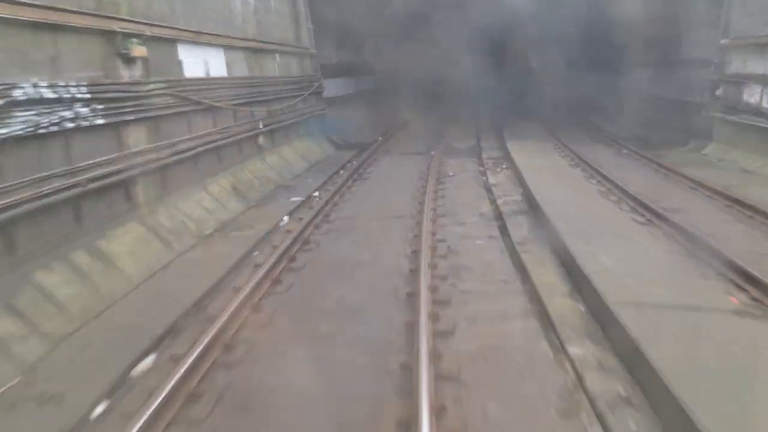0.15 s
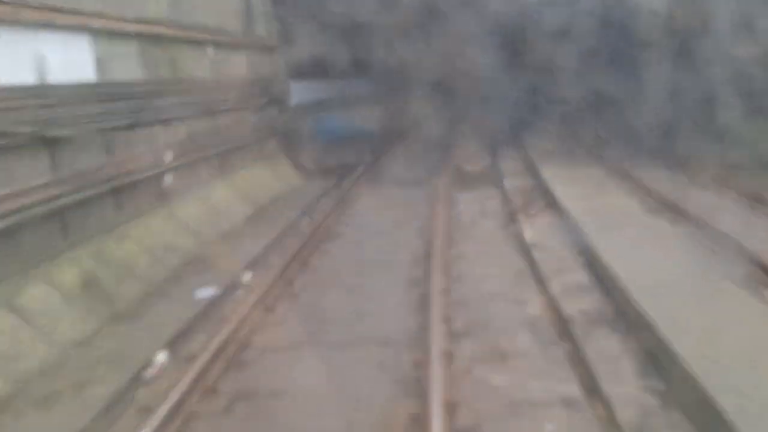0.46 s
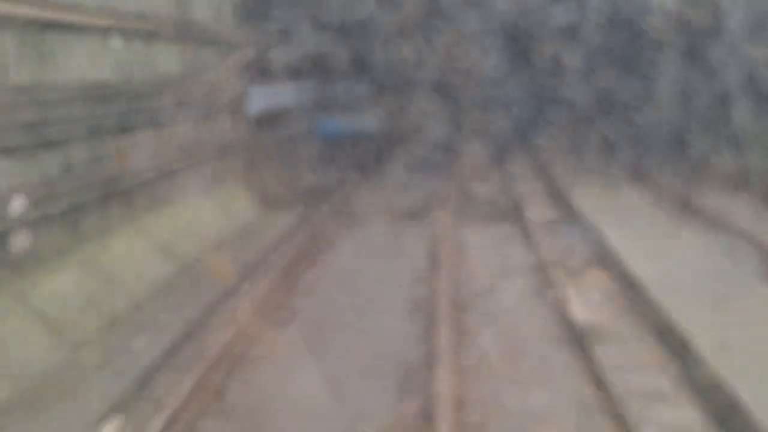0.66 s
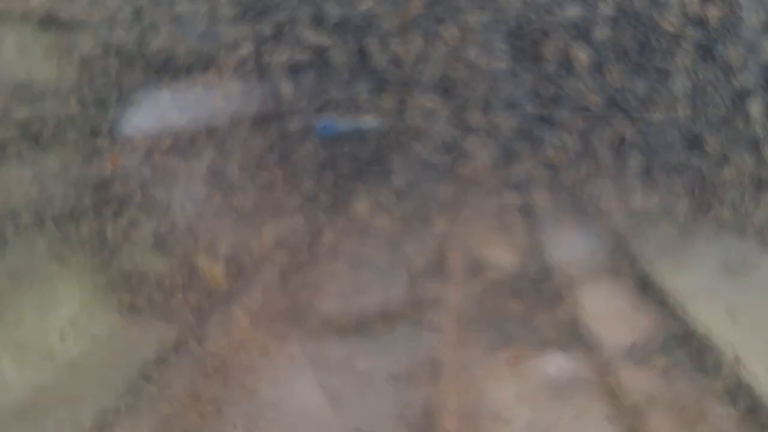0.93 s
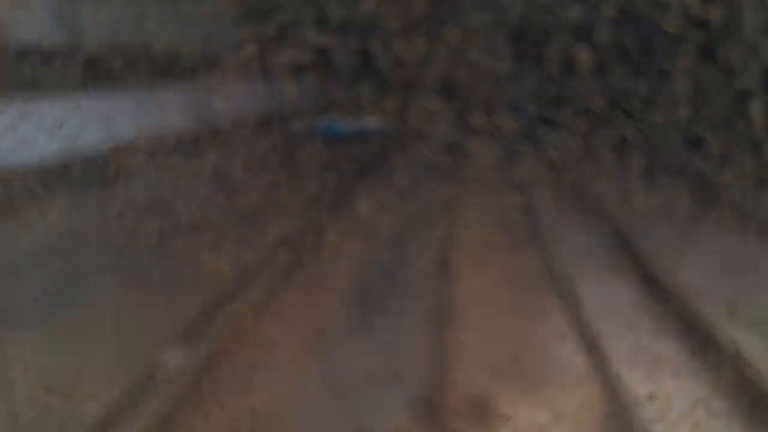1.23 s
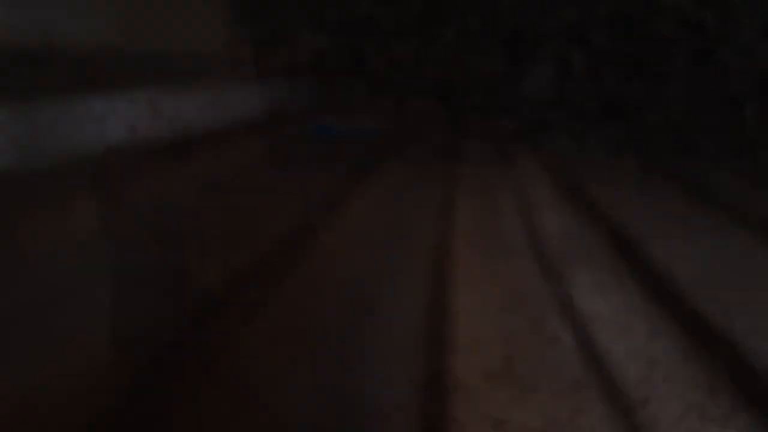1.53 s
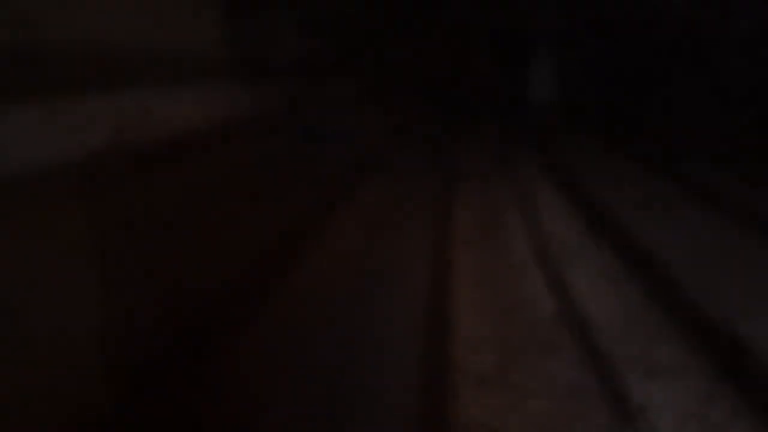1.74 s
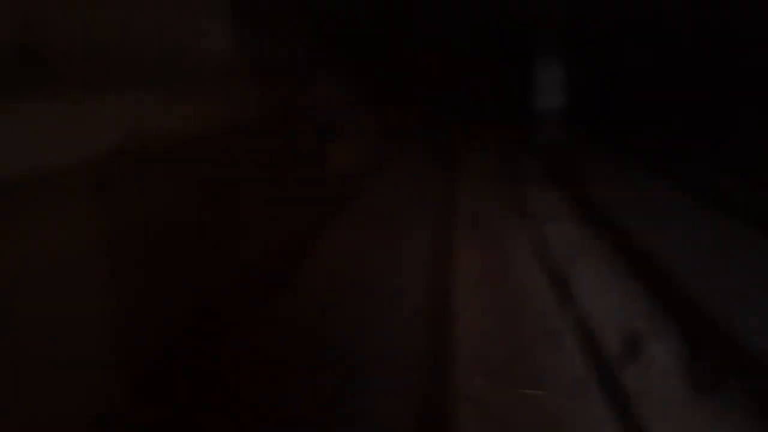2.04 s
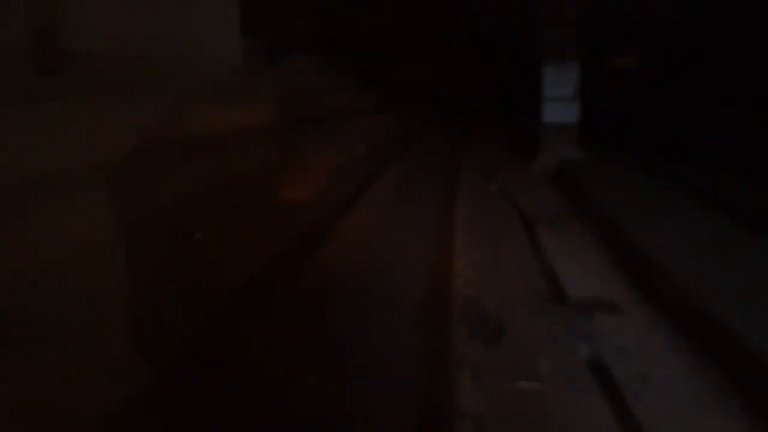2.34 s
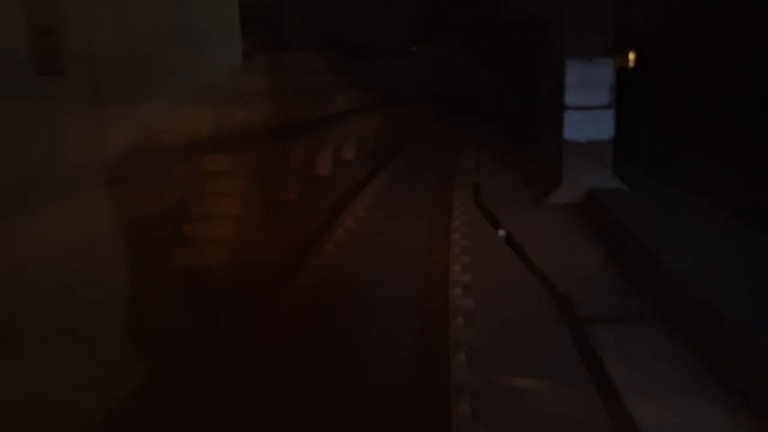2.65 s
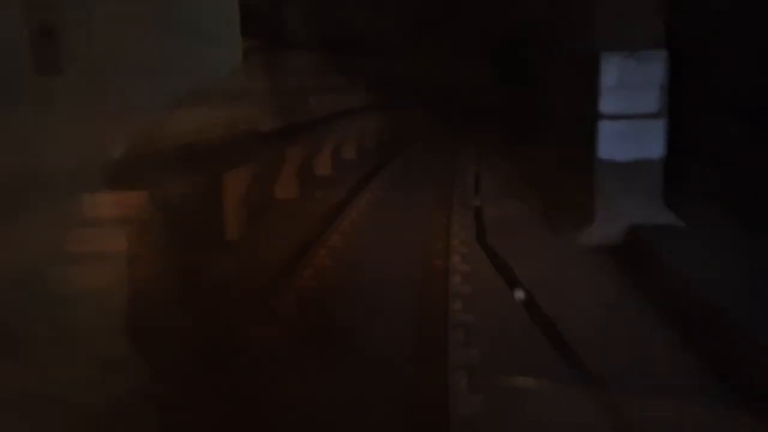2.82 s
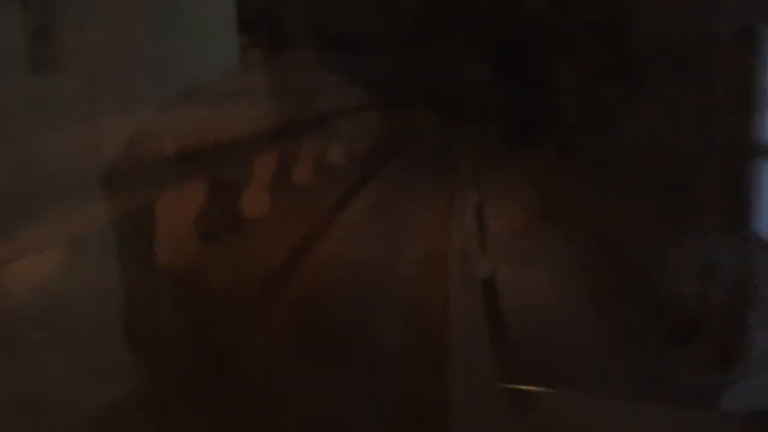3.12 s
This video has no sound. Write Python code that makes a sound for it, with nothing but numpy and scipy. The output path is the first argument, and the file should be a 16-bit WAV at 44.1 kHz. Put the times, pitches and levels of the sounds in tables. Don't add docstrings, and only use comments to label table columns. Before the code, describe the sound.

A moving train rumbles continuously inside its cab, deep booming surging unevenly beneath a rolling roar. Wheel-on-rail hiss scuffs about six times a second, with faint metallic ringing and tiny grit ticks, mostly in the first second. Around 1.7-1.8 seconds the tunnel makes the roar louder and fuller. Faint high squeals come and go from about 1.5 to 3.3 seconds; low thumps strengthen after 2.

```python
import sys
import numpy as np
from scipy import signal
from scipy.io import wavfile
from scipy.ndimage import uniform_filter1d

SR = 44100
rng = np.random.default_rng(int(sys.argv[2]) if len(sys.argv) > 2 else 0)


def invert_db(x):
    u = np.asarray(x, float) / 20
    return 10 ** u


def file_out(sig):
    cols = np.atleast_2d(sig).T
    lim = np.clip(cols, -1, 1)
    pcm = np.round(lim * 32767).astype(np.int16)
    wavfile.write(sys.argv[1], SR, pcm)


N = 144648


def evened(x):
    return x / np.sqrt(np.mean(x ** 2) + 1e-20)


def read(points, hz):
    f, value = np.transpose(points)
    return np.interp(np.log(hz + 1), np.log(f + 1), value)


def curve(points, t):
    return np.interp(t, *np.transpose(points))


def smoothed_twice(x, size):
    return uniform_filter1d(uniform_filter1d(x, size=size), size=size)


def sides(db):
    return invert_db(np.array([db / 2, -db / 2]))


def resonate(x, hz, width):
    turn = np.exp(2j * np.pi * hz * np.arange(x.shape[-1]) / SR)
    r = np.exp(-np.pi * max(width, 1) / SR)
    return (turn * signal.lfilter([(1 - r) ** 2], [1, -2 * r, r * r], x / turn)).real


def bins(size):
    return np.fft.rfftfreq(size, 1 / SR), np.arange(N * 4 // size + 5) * size / (4 * SR)


# frequency in Hz, likeness from -1 to 1 (clipped).
PORT_LIKENESS = [(200, 0.94), (300, 0.83), (600, 0.65), (900, 0.16), (1250, -1.136), (1600, -0.074),
                 (1800, 0.49), (2600, -0.07)]
# frequency in Hz, lead of the right port in radians.
PORT_LEAD = [(30, 0.48), (70, 0.27), (100, 0.17), (160, 0.087), (200, 0.13), (600, 0.029)]
# frequency in Hz, left minus right in dB.
LEAN_LOW = [(25, 5.5), (50, 2.4), (90, 2.6), (180, .6), (350, 1.2), (450, -1.1), (630, 2.6), (800, -1.5)]
# frequency in Hz, left minus right in dB.
LEAN_HIGH = [(1500, -3), (2500, -1.7), (3700, 0), (4400, -5), (6500, -4.5), (7900, .7), (10600, -13),
             (13000, -4)]


def air(field_db, size, lean, patchy_db, flicker_db):
    hz, t = bins(size)
    a, b, c, d, patches = rng.standard_normal((len(t), len(hz), 5)).T
    patches = uniform_filter1d(patches, size=10, axis=0)
    patches = evened(uniform_filter1d(patches, size=10, axis=1))
    flicker = evened(uniform_filter1d(rng.standard_normal(len(t)), size=3))
    same = np.clip(read(PORT_LIKENESS, hz), -1, 1)[:, None]
    left = a + 1j * b
    shared = same * left * np.exp(1j * read(PORT_LEAD, hz))[:, None]
    right = shared + np.sqrt(1 - same ** 2) * (c + 1j * d)
    z = np.array([left, right]) * sides(read(lean, hz))[:, :, None]
    z *= invert_db(field_db + patchy_db * patches + flicker_db * flicker)
    return signal.istft(z, nperseg=size, noverlap=size * 3 // 4)[1][:, :N]


# start in seconds, peak level in dB, pitch in Hz.
TICKS = [(0.0633, -38, 10700), (0.0927, -39, 9590), (0.2254, -57, 11600), (0.414, -46, 9810),
         (0.425, -42, 10000), (0.735, -44, 10200), (0.79, -47, 10000), (0.7067, -39, 9740),
         (0.8931, -45, 11700), (0.9488, -45, 10180), (1.7103, -45, 9800), (1.735, -42, 10200),
         (2.3693, -44, 10620), (3.045, -41, 9640)]
TICK_S, TICK_DB, TICK_LEAN_DB = 0.00095, -6, -12


def ticks():
    out, t = np.zeros((2, N + 600)), np.arange(600) / SR
    envelope = t / TICK_S * np.exp(1 - t / TICK_S)
    wobble = 0.71 * np.sin(2 * np.pi * 1400 * t)
    for s, db, hz in TICKS:
        snap = envelope * np.sin(2 * np.pi * hz * t + wobble)
        a = int(s * SR)
        out[:, a:a + 600] += invert_db(db + TICK_DB) * sides(TICK_LEAN_DB)[:, None] * snap
    return out[:, :N]


# middle in seconds, level in dB, pitch in Hz.
THUMPS = [(.3, -31, 200), (.9, -30.5, 151), (1.03, -29, 195), (1.17, -24, 145), (1.3, -22.5, 139.9),
          (1.62, -25, 148.7), (2.07, -24, 150), (2.17, -25, 150.4), (2.25, -23.5, 133.5),
          (2.5, -25.5, 298.7), (2.53, -30.5, 448.5), (2.54, -18, 135.7), (3.0, -16, 52.45), (2.2, -18, 50),
          (2.57, -25.5, 199.7), (2.75, -19, 124.1), (3.1, -23, 128.8), (3.19, -19.5, 125.1)]
THUMP_S = 0.024


def thumps():
    out, t = np.zeros((2, N)), np.arange(N) / SR
    for (s, db, hz), phase in zip(THUMPS, rng.random(len(THUMPS))):
        turn = 2 * np.pi * (hz * t + phase) + np.array([[0], [read(PORT_LEAD, hz)]])
        out += invert_db(db) * np.sqrt(2) * np.exp(-((t - s) / THUMP_S) ** 2) * np.sin(turn)
    return out


# start, loudest and end in seconds, pitch in Hz, level in dB.
SQUEALS = [(1.675, 1.72, 2.05, 6490, -56), (1.8, 2.16, 2.44, 6515, -48), (2.3, 2.4, 2.55, 6540, -56),
           (2.2, 2.38, 2.55, 7740, -56.5), (2.4, 2.58, 2.7, 7780, -55.5), (2.55, 2.73, 2.9, 7810, -51.5),
           (2.95, 2.985, 3.16, 6530, -51), (3.0, 3.08, 3.14, 6530, -54), (3.08, 3.2, 3.4, 6540, -56),
           (2.95, 3.0, 3.1, 3910, -48), (2.46, 2.55, 2.66, 3800, -59), (2.82, 2.88, 2.95, 3850, -57),
           (1.515, 1.57, 1.6, 9080, -61.5), (1.63, 1.66, 1.69, 9080, -67),
           (1.75, 1.772, 1.79, 11050, -61.5), (1.78, 1.805, 1.83, 10950, -62.5)]
SQUEAL_DB, SWELL = 0.5, 0.8
SQUEAL_WIDTH_HZ, SKIRT_WIDTH_HZ, SKIRT_DB = 110, 400, 6
PURE, WAVER_HZ, PORT_DRIFT = 0.64, 26, 1.1


def squeals():
    t, out = np.arange(N) / SR, np.zeros((2, N))
    for s, top, end, hz, db in SQUEALS:
        a, b = int(s * SR), min(int(end * SR), N)
        rub = rng.standard_normal((4, SR))[:, :b - a]
        waver = evened(smoothed_twice(rub[2:], 900))
        turn = 2 * np.pi * np.cumsum(hz + WAVER_HZ * waver[0]) / SR
        tone = np.sqrt(2) * np.sin(turn + PORT_DRIFT * waver[1] * np.array([[0], [1]]))
        core = evened(resonate(rub[:2], hz, SQUEAL_WIDTH_HZ))
        fuzz = core + invert_db(SKIRT_DB) * evened(resonate(rub[:2], hz, SKIRT_WIDTH_HZ))
        shape = np.interp(t[a:b], [s, top, end], [0, 1, 0]) ** SWELL
        gain = invert_db(db + SQUEAL_DB) * sides(read(LEAN_HIGH, hz))[:, None]
        out[:, a:b] += gain * shape * (PURE * tone + (1 - PURE) * fuzz)
    return out


# start in seconds, strength in dB over the hiss, length in seconds.
SCUFFS = [(0.034, 6.5, 0.058), (0.214, 10, 0.059), (0.399, 8.5, 0.025), (0.54, 3.5, 0.028),
          (0.7, 3.5, 0.066), (0.87, 0.5, 0.029), (1.022, 3, 0.074), (1.172, 3, 0.053), (1.347, 7, 0.036),
          (1.499, 0.5, 0.061), (1.707, 2, 0.056), (1.885, 0.5, 0.044), (2.041, 1, 0.16), (2.164, 6, 0.055),
          (2.242, 3.5, 0.19), (2.444, 4, 0.23), (2.72, 4, 0.067), (2.827, 7, 0.079), (3.031, 3.5, 0.045),
          (3.179, 7, 0.061)]
SCUFF_RISE_S, SCUFF_FALL_S = 0.011, 0.052
LULLS = [.37, .665, .845, .995, 1.15, 1.66, 1.84, 2.0, 2.71, 3.165]
LULL_DB, LULL_S = -4.5, 0.028


def scuffing(t):
    s, db, length = np.transpose(SCUFFS)[:, :, None]
    rise = np.clip((t - s) / SCUFF_RISE_S, 0, 1)
    fall = np.exp(-np.maximum(t - s - length, 0) / SCUFF_FALL_S)
    lull = np.exp(-((t - np.array(LULLS)[:, None]) / LULL_S) ** 2)
    return (db * rise * fall).max(0) + LULL_DB * lull.max(0)


# frequency in Hz, share from 0 to 1.
SCUFF_REACH = [(300, 0.13), (700, 0.27), (2000, 0.25), (6000, 0.41), (9500, 0.75), (14000, 0.75)]


def scuff_lift(hz, t):
    return read(SCUFF_REACH, hz)[:, None] * scuffing(t)


# time in seconds, hiss level in dB.
CONTACT = [(0, -45.5), (.9, -45), (1.7, -46), (2.2, -45), (2.57, -43.5), (2.72, -44), (3.28, -45)]


def contact(t):
    level = curve(CONTACT, t)
    return level.mean(), level - level.mean()


# pitch in Hz, width in Hz, level in dB.
WHEEL = [(1410, 25, -63), (1552, 20, -64), (1830, 25, -66), (2550, 60, -69), (3133, 40, -70),
         (3575, 15, -69), (3795, 40, -65), (4375, 20, -69), (5120, 220, -64)]


def wheels():
    t = np.arange(N) / SR
    out = np.zeros((2, N))
    for hz, width, db in WHEEL:
        ring = evened(resonate(rng.standard_normal((2, N)), hz, width))
        out += invert_db(db) * sides(read(LEAN_HIGH, hz))[:, None] * ring
    return out * invert_db(contact(t)[1] + 0.97 * scuffing(t))


# frequency in Hz, density in dB per Hz.
HISS = [(900, 3.5), (1300, 1), (2000, -6), (5200, -9.5), (7500, -13), (8600, -21.5), (10800, -18),
        (15500, -23)]
HISS_DB, CONTACT_TREBLE = 4.0, 0.3


def hiss():
    hz, t = bins(256)
    mean_db, change_db = contact(t)
    follows = np.where(hz > 8200, CONTACT_TREBLE, 1)[:, None]
    field = (read(HISS, hz) - 60 * (hz < 700))[:, None] + follows * change_db
    field = field + scuff_lift(hz, t)
    noise = air(field, size=256, lean=LEAN_HIGH, patchy_db=0.62, flicker_db=0.1)
    return invert_db(mean_db + HISS_DB) * evened(noise)


# time in seconds, roar level in dB.
WALLS = [(0, -28.5), (.3, -27.5), (.4, -30), (.6, -28.5), (1.15, -27.5), (1.5, -29.5), (1.69, -28),
         (1.82, -22.5), (2.05, -24), (2.3, -23.5), (2.47, -23), (2.55, -20.5), (2.65, -21), (2.85, -22),
         (3.12, -21.5), (3.2, -21.5), (3.28, -21)]
# frequency in Hz, density in dB per Hz.
ROAR_OPEN = [(85, -35), (110, 0.5), (140, 1.5), (250, -15.5), (300, -9.5), (800, -13), (1200, -23),
             (1700, -37)]
# frequency in Hz, density in dB per Hz.
ROAR_TUNNEL = [(85, -3), (110, 1), (170, -5.5), (260, -9.5), (480, -18), (800, -18.5), (1250, -36.5),
               (1700, -45)]
# pitch in Hz, width in Hz, lift in dB.
PANELS = [(142, 8.1, -1), (204.3, 22.6, 5.5), (302, 12, 4.5), (467, 35, 5.5), (660, 14.4, 6.5),
          (784, 20, 3)]
OPEN_DB, TUNNEL_DB = -36.5, -18.5


def roar():
    hz, t = bins(2048)
    level = curve(WALLS, t)
    shut = np.clip((level - OPEN_DB) / (TUNNEL_DB - OPEN_DB), 0, 1)
    colour = read(ROAR_OPEN, hz)[:, None] * (1 - shut) + read(ROAR_TUNNEL, hz)[:, None] * shut
    for f, width, lift in PANELS:
        colour = colour + (lift / (1 + (2 * (hz - f) / width) ** 2))[:, None]
    colour = colour - 60 * ((hz < 60) | (hz > 2500))[:, None]
    colour = colour - 10 * np.log10((invert_db(colour) ** 2).sum(0))
    field = colour + level - level.mean() + scuff_lift(hz, t)
    noise = air(field, size=2048, lean=LEAN_LOW, patchy_db=0.4, flicker_db=0.3)
    return invert_db(level.mean() + 2.01) * evened(noise)


# pitch in Hz, width in Hz, level in dB.
CAB = [(32, 28, -13), (45, 10.4, -0.5), (62, 30, -6), (71, 14, -14), (80.2, 19, 2.5)]
# frequency in Hz, density in dB per Hz.
SHAKE = [(8.8, -46), (15, -17), (70, -15), (87, 12), (113, -29), (130, -16.5), (170, -39), (290, -120)]
SHAKE_DB = -12.5


def cab_noise():
    hz, t = bins(8192)
    band_db = -60 * ((hz < 12) | (hz > 160))[:, None] * np.ones(len(t))
    flat = evened(air(band_db, size=8192, lean=LEAN_LOW, patchy_db=5.5, flicker_db=4.0))
    shake_db = band_db + read(SHAKE, hz)[:, None]
    shake = air(shake_db, size=8192, lean=LEAN_LOW, patchy_db=2.5, flicker_db=2.5)
    drum = np.zeros((2, N))
    for k, (f, width, db) in enumerate(CAB):
        drum += (-1) ** k * invert_db(db) * evened(resonate(flat, f, width))
    x = evened(drum) + invert_db(SHAKE_DB) * evened(shake)
    power = smoothed_twice((x ** 2).mean(0), 1500) + 1e-3
    return evened(x / np.sqrt(power))


# middle in seconds, strength in dB over the idle boom,
# length in seconds, pitch in Hz.
SURGES = [(0.034, 8, 0.058, 76.95), (0.105, 2, 0.02, 71), (0.209, 6, 0.05, 76.1),
          (0.336, 0.1, 0.052, 60.64), (0.405, 7.4, 0.018, 57.9), (0.452, 9.5, 0.018, 65.5),
          (0.526, 9, 0.029, 63.4), (0.578, 10.5, 0.025, 68.7), (0.61, 6.9, 0.013, 75.6),
          (0.673, 3, 0.036, 71.96), (0.727, 4.5, 0.07, 65.5), (0.764, 6, 0.043, 72),
          (0.849, 4, 0.027, 53.9), (0.929, 2, 0.024, 63.1), (0.999, 8, 0.055, 86.1),
          (1.051, 10.5, 0.03, 69.6), (1.125, 1.6, 0.045, 73.2), (1.177, 9.9, 0.045, 65.2),
          (1.325, 9, 0.075, 77.97), (1.359, 9.9, 0.048, 61.1), (1.475, 2.5, 0.037, 83.9),
          (1.529, 3.5, 0.058, 58.23), (1.592, 3, 0.02, 75.5), (1.681, 3, 0.042, 57.4),
          (1.75, 5.5, 0.037, 62.67), (1.836, 7.5, 0.029, 64.98), (1.885, 4.5, 0.027, 75.05),
          (2.005, 6, 0.072, 76.1), (2.074, 8.5, 0.025, 64.7), (2.146, 8.5, 0.067, 73),
          (2.256, 6.0, 0.022, 79.0), (2.324, 10, 0.05, 73.04), (2.442, 5.5, 0.056, 79.47),
          (2.504, 10, 0.031, 69.37), (2.549, 4.0, 0.04, 71), (2.613, 7.5, 0.044, 80.7),
          (2.657, 9.1, 0.058, 73.1), (2.757, 9.5, 0.024, 72.14), (2.85, 12.5, 0.024, 69.22),
          (2.956, 8.5, 0.048, 79.14), (3.041, 0, 0.023, 71.9), (3.12, 6.5, 0.041, 79.6),
          (3.186, 11, 0.035, 63.4), (3.247, 3, 0.045, 65)]
IDLE_DB, SWING_DB, NOISE_DB = -17.5, -1, -2
SAG_HZ_PER_S, SWING_LEAD, SWING_LEAN_DB = -150, 0.36, 2.5


def boom():
    noise = cab_noise()
    s, db, length, pitch = np.transpose(SURGES)[:, :, None]
    t = np.arange(0, N + 64, 64) / SR
    surge_db = (db * np.exp(-((t - s) / (0.63 * length)) ** 4)).max(0)
    near = np.exp(-((t - s) / length) ** 2) + 1e-9 / (1 + 1e4 * (t - s) ** 2)
    sagging = pitch + SAG_HZ_PER_S * np.clip(t - s, -length, length)
    floor_hz = (near * sagging).sum(0) / near.sum(0)
    surge_db, floor_hz = (np.interp(np.arange(N) / SR, t, v) for v in (surge_db, floor_hz))
    turn = 2 * np.pi * (np.cumsum(floor_hz) / SR + rng.random()) + np.array([[0], [SWING_LEAD]])
    swing = np.sqrt(2 * abs(invert_db(2 * surge_db) - 1)) * np.sin(turn)
    floor = invert_db(SWING_DB) * sides(SWING_LEAN_DB)[:, None] * swing
    return invert_db(IDLE_DB) * (floor + invert_db(NOISE_DB + 0.46 * surge_db) * noise)


def scene():
    return ticks() + thumps() + squeals() + wheels() + hiss() + roar() + boom()


def top_cut(x):
    return signal.sosfilt(signal.butter(12, 16310, fs=SR, output="sos"), x)


def record(dry):
    limited = np.tanh(dry)
    edge = signal.firwin(1023, 15760, window=("kaiser", 9), fs=SR)[None]
    mix = signal.oaconvolve(limited, edge, "same")
    return top_cut(mix)


dry = scene()
out = record(dry)
file_out(out)
```